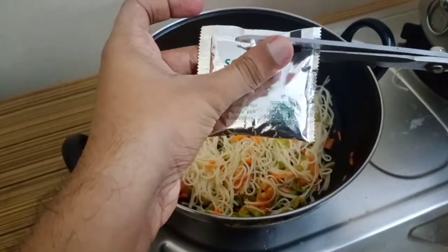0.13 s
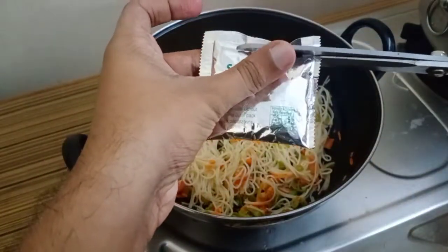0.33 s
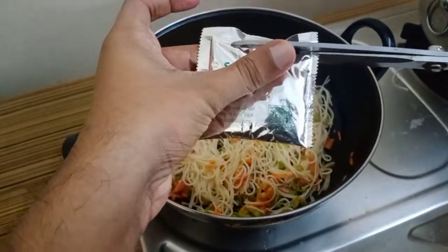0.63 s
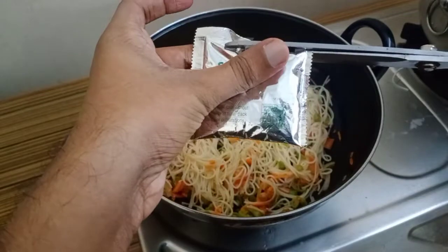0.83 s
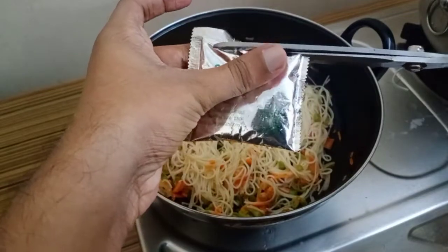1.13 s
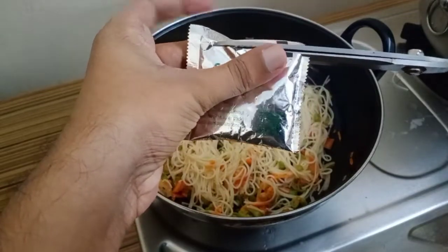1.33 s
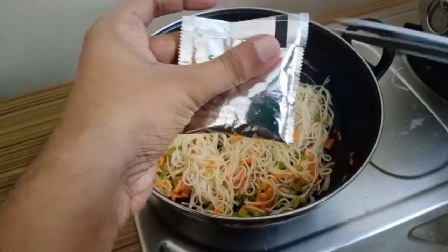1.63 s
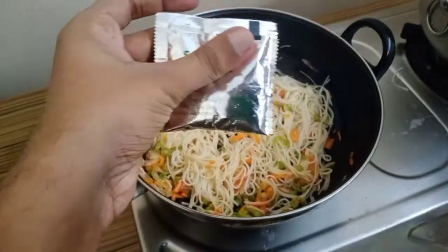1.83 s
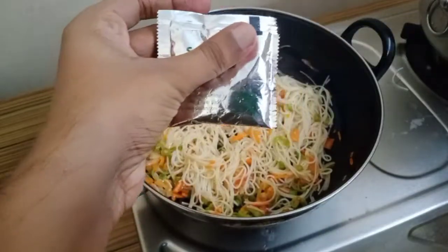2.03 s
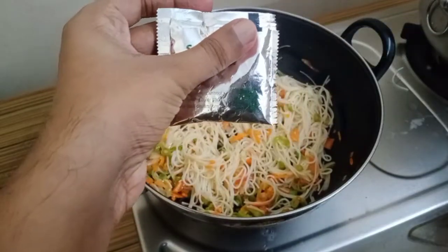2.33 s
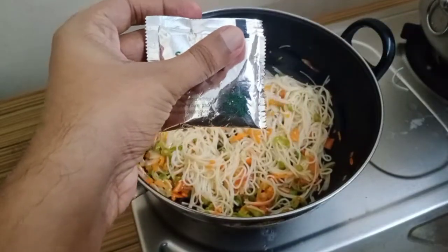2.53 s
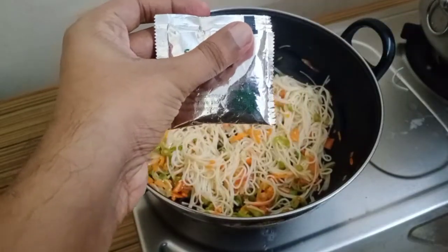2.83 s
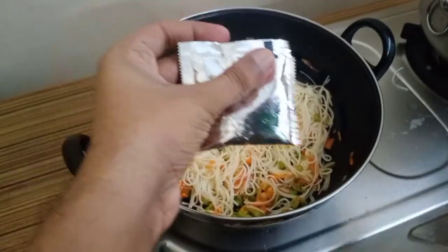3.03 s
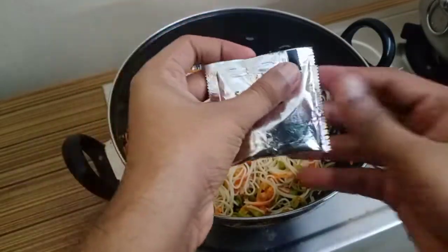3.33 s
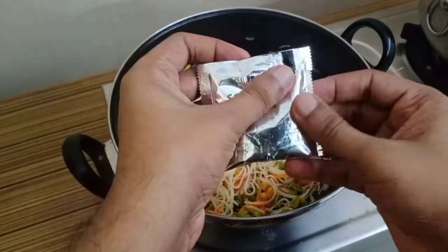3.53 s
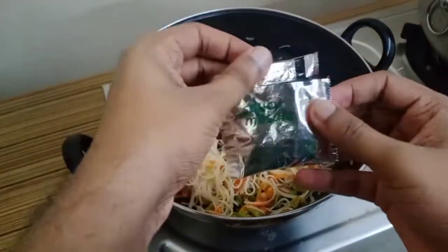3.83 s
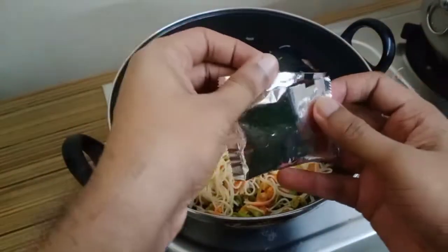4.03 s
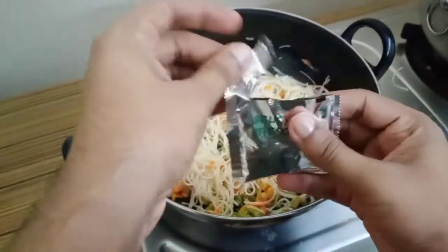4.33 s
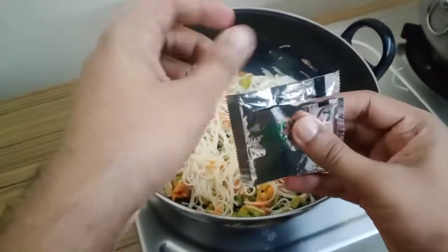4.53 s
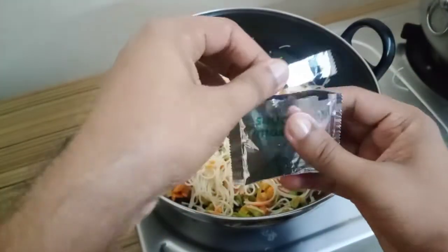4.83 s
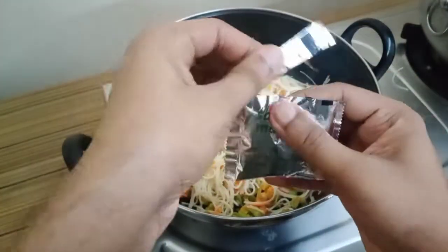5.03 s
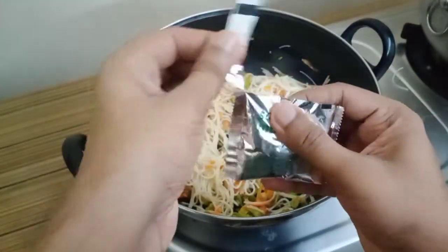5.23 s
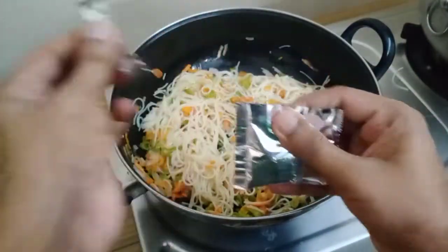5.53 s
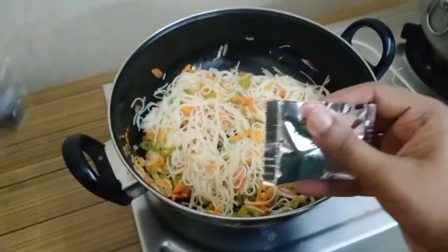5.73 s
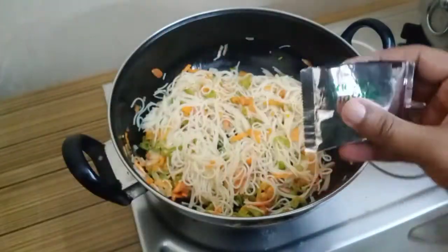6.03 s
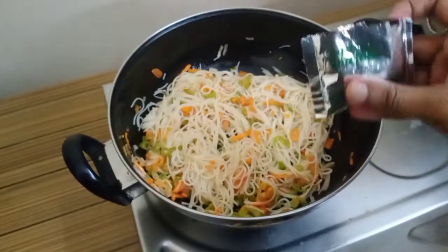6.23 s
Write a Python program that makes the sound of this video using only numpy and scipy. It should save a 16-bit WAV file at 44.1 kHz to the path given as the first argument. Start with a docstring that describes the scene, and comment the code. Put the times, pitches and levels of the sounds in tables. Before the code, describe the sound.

A foil sachet crackles and is snipped, scissors clatter onto a counter, then the foil is torn, over a faint throbbing hum and soft sizzle.

```python
"""A low rumble, a softly sizzling pan and the rustle of a foil sachet open the scene, close to a phone in a
kitchen; a low hum throbs four times a second, perhaps a wobbling fan. The foil crinkles, is snipped and torn;
the scissors are put down on a counter with three knocks and a few bounces that ring in the room.
Filtered noise makes rumble and rustle, sparse clicks the sizzle, a gliding sine the hum; bursts and decaying
resonances make snaps and knocks. The phone's noise suppressor cuts quiet sound."""
import sys
import numpy as np
from scipy import signal
from scipy.io import wavfile
from scipy.ndimage import uniform_filter1d

SR = 44100
rng = np.random.default_rng(int(sys.argv[2]) if len(sys.argv) > 2 else 0)


def output_pcm(signal):
    """Save a mono or channel-first signal as 16-bit PCM at the path in sys.argv[1].

    Samples are clipped to [-1, 1] before scaling.
    """
    pcm = np.clip(np.atleast_2d(signal).T, -1, 1) * 32767
    wavfile.write(sys.argv[1], SR, np.round(pcm).astype(np.int16))


N = 281799  # length in samples


def amp(db):
    """Decibel law: the amplitude ratio of a level."""
    return 10 ** (np.asarray(db) / 20)


def evened(x):
    """Normalisation to an effective (RMS) value of 1."""
    return x / np.sqrt(np.mean(x ** 2) + 1e-20)


def read(points, hz):
    """Interpolation of a spectrum on a logarithmic frequency axis."""
    f, value = np.transpose(points)
    return np.interp(np.log(hz + 1), np.log(f + 1), value)


def along(rows):
    """Linear interpolation in time: the columns of a curve at every sample."""
    s, *columns = np.transpose(rows)
    return [np.interp(np.arange(N) / SR, s, c) for c in columns]


def add(mix, s, sound):
    """Superposition: a sound joins the mix, in place, from time s in seconds."""
    part = mix[round(s * SR):][:len(sound)]
    part += sound[:len(part)]


def coloured(x, points, tilt_db=0.):
    """Minimum-phase filtering: a causal filter of energy 1, its spectrum tilted in dB per octave around 1 kHz."""
    hz = abs(np.fft.fftfreq(4096, 1 / SR))
    level_db = read(points, hz) + tilt_db * np.log2((hz + 50) / 1000)
    log_gain = np.log(amp(level_db))
    # the Hilbert transform of the log gain gives the phase of a causal filter
    response = np.exp(np.conj(signal.hilbert(log_gain)))
    taps = np.fft.ifft(response).real[:2048]
    return signal.oaconvolve(x, taps / np.linalg.norm(taps))[:len(x)]


def band(x, hz, width_hz):
    """Simple resonance: a two-pole resonator of gain 1 at its centre."""
    return signal.lfilter(*signal.iirpeak(hz, hz / width_hz, SR), x)


def split(x, hz, side):
    """Crossover filtering: the part of a sound below or above a frequency."""
    return signal.sosfilt(signal.butter(4, hz, side, fs=SR, output="sos"), x)


def crackle(per_s, spread_db):
    """Random impulse train: sparse clicks of random sign, a few of them large."""
    size_db = spread_db * np.minimum(rng.exponential(1, N), 5)
    size = amp(size_db) * rng.choice([-1., 1.], N)
    return evened(size * (rng.random(N) < per_s / SR))


def patchy(x, depth_db):
    """Spectral modulation: random patches in time and frequency, as each bit of foil favours other pitches."""
    z = signal.stft(x, nperseg=256)[2]
    field = rng.standard_normal(z.T.shape).T
    field = uniform_filter1d(field, size=3, axis=0)
    field = evened(uniform_filter1d(field, size=14, axis=1))
    return signal.istft(z * amp(depth_db * field), nperseg=256)[1][:N if len(x) == N else len(x)]


# Reverberation of the kitchen. Each row: frequency in Hz, time to decay by 60 dB in seconds.
ROOM_T60 = [(100, 1.0), (250, 0.91), (500, 0.55), (1000, 0.74), (2000, 0.65), (3500, 0.66), (6000, 0.49),
            (12000, 0.37)]


def room(x):
    """Diffuse reverberation: dense reflections, each band dying at its own speed with an even share of energy."""
    hz, t, z = signal.stft(rng.standard_normal(SR), SR, nperseg=512)
    dying = amp(-60 * t / read(ROOM_T60, hz)[:, None])
    z = z * dying
    z *= (np.linalg.norm(dying, axis=1) / np.linalg.norm(z, axis=1))[:, None]
    tail = signal.istft(z, SR, nperseg=512)[1]
    tail *= 1 - np.exp(-np.arange(len(tail)) / (.003 * SR))  # gradual build-up
    return signal.fftconvolve(x, tail / np.linalg.norm(tail))[:len(x)]


# Spectrum of the kitchen rumble. Each row: frequency in Hz, relative density in dB per Hz.
AIR_SPECTRUM = [(24, -59), (40, -42), (100, -25.5), (173, -3.5), (237, -14), (306, 0), (443, -13),
                (615, -12), (1200, -20.5), (1700, -38)]
# Course of the rumble. Each row: time in seconds, level in dB.
AIR_COURSE = [(0, -50.5), (.8, -56), (1.0, -62), (2.2, -66.5), (3.3, -68), (6.39, -67.5)]
# Fuzzy hums in the rumble. Each row: frequency in Hz, width in Hz, level against the rumble in dB.
AIR_HUMS = [(165, 64, -7), (454, 17, -9.5)]


def air():
    """Narrow-band noise: low kitchen rumble with two hums blurred by their bandwidth."""
    noise = rng.standard_normal(N)
    hums = sum(amp(db) * evened(band(noise, hz, width)) for hz, width, db in AIR_HUMS)
    rumble = coloured(rng.standard_normal(N), AIR_SPECTRUM)
    return amp(along(AIR_COURSE)[0]) * (rumble + hums)


# Spectrum of the frying oil. Each row: frequency in Hz, relative density in dB per Hz.
SIZZLE_SPECTRUM = [(1760, -79), (3000, -24.5), (5050, -22.5), (5500, -15), (6670, -11.5), (9460, -31),
                   (12300, -29.5), (15100, -27), (16000, -29.5), (16500, -63)]
SIZZLE_DB, SWELL_DB = -55, 3.5  # level of the pan and RMS depth of its slow swell


def pan():
    """Shot noise: dense tiny bursts of frying oil that swell a little."""
    bursts = crackle(2500, 4.2)
    swell = evened(split(rng.standard_normal(N), 3, "low"))
    oil = coloured(bursts + 0.5 * rng.standard_normal(N), SIZZLE_SPECTRUM)
    return amp(SIZZLE_DB + SWELL_DB * swell) * oil


# Spectrum of the foil before any tilt. Each row: frequency in Hz, relative density in dB per Hz.
FOIL_SPECTRUM = [(290, -72), (500, -18.5), (938, -13.5), (1220, -6), (1760, 0), (2100, -16), (2430, -4.5),
                 (3660, 0.5), (4760, -1), (6660, 5), (9460, -23), (15100, -22), (16500, -26)]
TICKS_PER_S, TICK_DB, TICK_T60 = 63, -4.5, 0.044  # stray creases: rate, level against the rustle curve, ring in s


def ticks():
    """Impulse response: stray creases click sparsely, each with a short ring at one of 16 pitches."""
    clicks = crackle(TICKS_PER_S, 3.3)
    which = rng.integers(0, 16, N)
    t = np.arange(4000) / SR
    decay = amp(-60 * t / TICK_T60)
    rings = sum(signal.oaconvolve(clicks * (which == k), decay * np.sin(2 * np.pi * hz * t))[:N]
                for k, hz in enumerate(np.geomspace(1300, 5200, 16)))
    return coloured(clicks, FOIL_SPECTRUM) + 0.95 * evened(rings)


# Handling of the foil in two stretches of rows.
# Each row: time in seconds, relative rustle level in dB, relative level of the fizz above 11.5 kHz in dB.
FOIL_HANDLING = [
    [(0.0, -56.5, -78), (0.1, -62, -80), (0.27, -64, -86), (0.54, -66, -84), (0.67, -65, -58),
     (1.05, -78, -66), (1.45, -62.5, -51.5), (1.94, -65, -74), (2.2, -71, -45.5)],
    [(3.15, -82, -68.5), (3.31, -65.5, -81), (3.75, -59.5, -68), (4.33, -52.5, -55.5), (4.6, -76, -52.5),
     (4.9, -60.5, -76), (5.17, -56, -54.5), (5.69, -70, -64), (6.39, -59.5, -81.5)],
]


def rustle():
    """Crackling noise: small creases merge into a rustle with treble fizz; the stray ticks follow its level."""
    rustle_db, fizz_db = along(sum(FOIL_HANDLING, []))
    creases = crackle(880, 4.9) + 0.69 * rng.standard_normal(N)
    treble = evened(split(creases, 11500, "high"))
    hiss = amp(rustle_db) * coloured(creases, FOIL_SPECTRUM, -5.5) + amp(fizz_db - 5.5) * treble
    return hiss, amp(rustle_db + TICK_DB) * ticks()


# Foil snaps. Each row: time in seconds, level in dB, length in ms, pitch of the crease in Hz, then against
# the snap's bright part: body under 2.4 kHz in dB, fizz above 12 kHz in dB; last, crumpling against the snap in dB.
FOIL_SNAPS = [(0.034, -38, 1.8, 1330, -13, -11, -14), (0.0643, -34, 0.98, 3560, -9, -4, -15.5),
              (0.1841, -39.5, 2.3, 5000, -11, -8, -14), (0.24, -42, 2, 1380, -0.5, 0, -11.5),
              (0.4048, -32.5, 11.4, 1540, -6.5, -32, -34), (0.4293, -39.5, 0.93, 1680, -15, -47, -30),
              (0.46, -38, 1.2, 3740, -10, -18, -16), (0.5778, -25.5, 3.8, 3920, -19, -28, -23.5),
              (0.612, -36.5, 1.4, 3740, -11.5, -11, -15.5), (0.6771, -33.5, 2.5, 2300, -4, -2, -10.5),
              (0.7149, -24.5, 25, 3300, -11, -5.5, -21), (0.8818, -36, 1.6, 3570, -32, -27, -26),
              (0.9291, -30, 1.9, 4950, -56, -43, -41), (0.9627, -34.5, 1.7, 4700, -17.5, -1.5, -13.5),
              (1.021, -36.5, 2.6, 2670, -6.5, -20, -15.5), (1.1848, -33.5, 1.7, 3400, -16, -5, -12),
              (1.2065, -23, 2.2, 3150, -14.5, -10, -18), (1.2251, -15.5, 12, 2340, -10.5, -11.5, -48),
              (1.3411, -32, 2.6, 4260, -28, -0.5, -16.5), (1.4419, -31, 1.3, 3500, -6, -21, -34.5),
              (1.4981, -32.5, 6.4, 2340, -15, -35, -17.5), (1.557, -33.5, 1.3, 3360, -5.5, 3, -18.5),
              (1.6451, -34, 1.7, 4700, -40, 1, -25), (1.68, -30.5, 5.9, 4830, -9, -13, -16.5),
              (1.8074, -37.5, 1.3, 4070, -42, -2, -12), (1.932, -38, 2.4, 4300, -15, -15, -22),
              (1.9514, -36, 2.3, 3200, -9, -10, -21.5), (1.993, -41.5, 1.6, 4100, -10, -23, -31),
              (2.07, -43.5, 0.77, 3800, -3, -2.5, -14), (2.8963, -37.5, 0.77, 1380, -32, -14, -7),
              (3.1658, -32, 1.9, 4130, -43, -1, -35), (3.1968, -32, 1.3, 4400, -29, -32, -17),
              (3.21, -29, 4.7, 4750, -15.5, -40, -21), (3.2353, -25.5, 1.7, 4270, -9, -31, -27.5),
              (3.2441, -37, 3.3, 4730, -6.5, -33, -13.5), (3.2878, -36, 3.5, 3550, 0.5, -23, -35),
              (3.3253, -29.5, 1.8, 4630, -37, -39, -23), (3.3661, -30, 1.4, 4880, -12, -10, -19),
              (3.405, -34, 4, 1300, -9, -10, -12.5), (3.4398, -23.5, 2.1, 4400, -7, -12, -28.5),
              (3.616, -54, 2.9, 4600, -66, -27, -34), (3.89, -45, 1.5, 4480, -25, -23, -27),
              (3.9374, -48, 2.8, 4500, -20, -45, -36), (4.0493, -29.5, 1.8, 4700, -5.5, -27, -19.5),
              (4.1103, -29, 0.61, 4600, -32, -20, -40), (4.2004, -28.5, 1.8, 3100, -37, -4, -45),
              (4.2261, -30, 3, 4600, -35, -26, -27), (4.291, -37.5, 3.4, 3750, -8, -36, -7),
              (4.3595, -26, 1.9, 4770, -10.5, -27, -46), (4.4209, -19.5, 19.5, 1480, -7, -9, -54),
              (4.4329, -20.5, 2.2, 1240, -4.5, -10, -28), (4.5416, -30, 2, 1970, -14.5, -3, -21.5),
              (4.6384, -40, 0.79, 5500, -12.5, -10, -11.5), (4.738, -32, 3.2, 4400, -43.5, -40, -29),
              (4.779, -33.5, 3, 1440, -3.5, -30, -16), (4.7915, -31.5, 2.5, 1650, -4, -9.5, -16),
              (4.8463, -32, 1.3, 3740, -30, -39, -23), (4.8943, -34.5, 11, 5700, -19, -31, -21),
              (4.9585, -27.5, 0.27, 4070, -28, -8, -20.5), (4.9693, -38, 4.2, 5300, -5, 0.5, -18.5),
              (5.0414, -35, 2, 4440, -3.5, 1, -27), (5.0741, -31, 3.1, 3700, -8.5, -7.5, -19),
              (5.095, -38.5, 2.1, 1530, -3, -24, -20.5), (5.1371, -23, 2.8, 5370, -20, -8, -28),
              (5.185, -45, 1.5, 1820, 3, -25, -27), (5.24, -36.5, 1.4, 2960, -3.5, -18, -20),
              (5.2976, -26, 4.2, 4180, -7, -8.5, -20), (5.3219, -29, 1.6, 1360, -20, -2.5, -21.5),
              (5.3383, -28.5, 2.7, 1700, 1, -23, -47), (5.37, -30.5, 1.2, 5140, -23, -19, -33),
              (5.432, -40, 2.4, 4000, -6, -27, -12.5), (5.5236, -18, 14.4, 1524, -10.5, -10, -33),
              (5.6902, -18.5, 4, 5300, -36.5, -33, -43), (5.7151, -31.5, 1.2, 4800, -5.5, -31, -23.5),
              (5.82, -41, 1.2, 3500, -34, -33.5, -13), (5.8324, -36, 2, 1740, -7.5, 0, -17.5),
              (5.8754, -30.5, 3.4, 1530, -14, -1, -34), (5.9112, -28, 1.9, 4560, -11, -36, -15),
              (6.0323, -39, 2.5, 3730, -27, -20, -17), (6.235, -31, 1.5, 4000, -10.5, -42, -15.5)]


def snaps():
    """Sudden release of strain: each crease snaps or rips, rings at its own pitch and crumples on briefly."""
    lead = .015  # seconds kept before each snap
    snapping, crumpling = np.zeros((2, N))
    t = np.arange(round(.16 * SR)) / SR - lead
    draws = rng.standard_normal((len(FOIL_SNAPS), 2, len(t)))
    for (s, db, ms, hz, body_db, fizz_db, after_db), (noise, luck) in zip(FOIL_SNAPS, draws):
        # the crease itself at time 0, and a few further ones
        grain = noise * (1 + 3.3 * (luck > 2.2)) + 4.0 * (abs(t) < .6 / SR)
        rip = np.exp(-abs(t) * 1000 / (ms * np.where(t < 0, .18, .3)))  # rises faster than it falls
        dying = amp(-60 * t / 0.18) * (t > 0)
        burst = grain * np.array([rip, dying])  # row 0 snaps, row 1 crumples
        ring = 2.2 * band(burst, hz, 0.045 * hz)
        bright = np.array([coloured(b, FOIL_SPECTRUM) for b in split(burst, 2760, "high")]) + ring
        body = split(split(burst, 2445, "low"), min(1180, 0.66 * hz), "high")
        fizz = split(burst, 12000, "high")
        parts = ((0, bright), (body_db, body), (fizz_db, fizz))
        # each part is scaled by its peak within the snap
        snap, after = sum(amp(level) * part / abs(part[0]).max() for level, part in parts)
        add(snapping, s - lead, amp(db) * snap)
        early_level = after[(t > 0) & (t < .045)].std()
        add(crumpling, s - lead, amp(db + after_db) * after / early_level)
    return snapping, crumpling


def foil():
    """Superposition of direct and reflected sound: rustle, snaps and ticks with the room's answer."""
    hiss, stray = rustle()
    snapping, crumpling = snaps()
    direct = snapping + patchy(crumpling + hiss, 4.0) + stray
    return direct + amp(-7.5) * room(direct)


# Throbs of the hum. Each row: start in seconds, time to the peak in seconds (kept within limits below),
# length in seconds, peak of the tone's envelope in dB (RMS), opening pitch in Hz, rumble against the tone in dB.
HUM_THROBS = [(0.005, .015, 0.078, -45.5, 306, -3), (0.227, 0.028, .17, -44, 328.6, -15),
              (0.495, 0.039, 0.1, -48, 314.2, 1), (0.735, 0.03, 0.089, -45.5, 303, 0.5),
              (0.97, 0.058, 0.15, -43, 304.2, -6), (1.209, .012, 0.15, -44, 299.7, -21),
              (1.442, 0.013, 0.14, -46, 277, -21), (1.689, 0.041, .16, -46.5, 312, -8),
              (1.957, 0.036, 0.081, -45.5, 329, -3), (2.467, 0.06, 0.3, -48.5, 310, 1),
              (3.019, .015, .14, -48, 306, 3.5), (3.24, 0.047, 0.12, -42.5, 295, -2.5),
              (3.475, 0.015, 0.13, -42, 304.5, -10), (3.757, 0.044, 0.068, -46, 299, -3),
              (3.967, 0.006, 0.14, -41.5, 274, -9), (4.218, 0.055, .16, -45.5, 323, 2),
              (4.449, 0.02, 0.092, -44.5, 294, -8.5), (4.707, 0.031, 0.096, -45, 274, 0.5),
              (4.958, 0.025, 0.15, -45.5, 319.6, -1.5), (5.201, 0.034, .14, -46.5, 308, 0.5),
              (5.454, 0.058, 0.11, -45.5, 286.4, 5), (5.705, 0.034, .16, -45, 308.6, -12),
              (5.97, 0.039, 0.14, -45.5, 313.6, -2.5), (6.217, 0.03, 0.3, -48, 312, 6)]
# Air moved with each throb. Each row: frequency in Hz, relative density in dB per Hz.
PUFF_SPECTRUM = [(40, -34), (110, -8.5), (170, -10), (230, 6), (420, -12), (520, -57.5), (800, -25)]
THROB_HZ, SETTLE_S = 316.9, 0.0626  # the pitch every throb glides to, and the time constant of the glide
ONSET_DB, SAG_DB, RELEASE_S = -13, -8, 0.028  # start and end of a throb against its peak; its last fade


def throbs():
    """Amplitude and frequency modulation: a gliding tone with a puff of rumble, switched on once a turn."""
    tone, unrest, puff = np.zeros((3, N))
    for s, rise, length, db, hz, rumble_db in HUM_THROBS:
        t = np.arange(0, length + RELEASE_S, 1 / SR)
        rise = np.clip(rise, .002, length - .01)
        corners = [0, rise, length, length + RELEASE_S]
        shape = amp(db + np.interp(t, corners, [ONSET_DB, 0, SAG_DB, -35]))
        early = np.exp(-t / SETTLE_S)
        pitch = THROB_HZ + (hz - THROB_HZ) * early
        add(unrest, s, shape * (.15 + early))
        add(puff, s, shape * early * amp(rumble_db))
        add(tone, s, shape * np.sqrt(2) * np.sin(2 * np.pi * np.cumsum(pitch) / SR))
    flutter = evened(band(band(rng.standard_normal(N), 305.7, 58), 305.7, 58))
    rumble = coloured(rng.standard_normal(N), PUFF_SPECTRUM)
    return tone + amp(1) * unrest * flutter + puff * rumble


# Scissors on the counter. Each row: time in seconds, relative strength of the blow in dB, steel blade against
# counter in dB, brightness in dB per octave, relative level of the ringing modes in dB.
SCISSOR_KNOCKS = [(2.2197, -12, 16, 0.5, -13), (2.394, -17, -4, 2.5, -9), (2.475, -22, -8.5, -2.5, -14),
                  (2.575, -29.5, -1, 1, -22.5), (2.699, -6.5, -25, 0, -11), (2.79, -17, -12, -0.5, -5.5)]
# Colour of a blow before its brightness tilt. Each row: frequency in Hz, relative density in dB per Hz.
COUNTER_SPECTRUM = [(35, -55.5), (60, -18.5), (113, -23.5), (177, -12.5), (366, -6), (453, -7.5),
                    (573, 0.5), (796, -11), (2600, -16.5), (6450, -23), (9400, -54.5), (15000, -38.5),
                    (16500, -66)]
# Steel resonances, each applied twice. Each row: frequency in Hz, width of one pass in Hz, relative level in dB.
BLADE_MODES = [(592, 110, -1.5), (1173, 220, 2), (1653, 260, -4.5), (2280, 260, -7.5), (3143, 450, -2),
               (3750, 260, -2.5), (4480, 130, -5), (5400, 550, -1), (6350, 810, -1)]
# Counter and room modes. Each row: frequency in Hz, level before tilt in dB, time to decay by 60 dB in seconds.
RING_MODES = [(122, -16.5, .95), (175.2, -10, 0.55), (232.6, -19.5, 0.5), (323, -23.5, 0.95),
              (429.8, -5, 0.34), (459.5, -3, 0.39), (534, -22.5, .6), (554, -6.5, 0.54), (592.7, -6, 0.5),
              (660, -29.5, 0.91), (707.5, -13, 0.27), (754, -12, 0.27), (883, -17, 0.56), (1227, -38, 0.35)]


def knocks():
    """Modal excitation: a hard tick coloured by counter and blade, the modes it rings, the room's long answer."""
    out = np.zeros(N)
    t = np.arange(SR) / SR
    draws = rng.standard_normal((len(SCISSOR_KNOCKS), len(t)))
    for (s, db, blade_db, tilt_db, ring_db), draw in zip(SCISSOR_KNOCKS, draws):
        contact = (t == 0) + .06 * draw * np.exp(-t / .004)  # an impulse and a short scrape of noise
        blade = sum(amp(level) * band(band(contact, hz, width), hz, width) / np.sqrt(width)
                    for hz, width, level in BLADE_MODES)
        steel = amp(blade_db) * blade / np.linalg.norm(blade)
        tick = coloured(contact, COUNTER_SPECTRUM, tilt_db) + steel
        tick *= 4.64 / np.linalg.norm(tick)
        ring = sum(amp(level + tilt_db * np.log2(hz / 1000) - 60 * t / t60) * np.sin(2 * np.pi * hz * t)
                   for hz, level, t60 in RING_MODES)
        ring *= 1 - np.exp(-t / 0.002)  # room modes build up
        # in the bass the single modes take over from the diffuse field
        diffuse = room(tick - 0.5 * uniform_filter1d(tick, size=90))
        add(out, s, amp(db) * (amp(-0.5) * tick + amp(6.5) * diffuse + amp(ring_db) * ring))
    return out


def scene():
    """Linear superposition of all sources, as one channel."""
    return (air() + pan() + foil() + throbs() + knocks())[None]


# Threshold of the noise suppressor. Each row: frequency in Hz, level in dB.
SUPPRESSOR_THRESHOLD = [(100, -65.5), (300, -57), (700, -60), (2000, -65.5), (4500, -68.5), (6500, -80.5),
                        (10000, -78), (15000, -74)]
EDGE_HZ = 16300  # upper band limit


def record(dry):
    """Spectral gating: bands whose smoothed level sinks under the threshold are lowered; then the band limit."""
    hz, _, z = signal.stft(dry[0], SR, nperseg=512, noverlap=384)
    power = uniform_filter1d(abs(z) ** 2, size=3, axis=0)
    power = abs(uniform_filter1d(power, size=11, axis=1))
    threshold = amp(2 * read(SUPPRESSOR_THRESHOLD, hz))[:, None]  # as power
    gain = np.maximum(power / (power + threshold), amp(-12.5))
    kept = signal.istft(z * gain, SR, nperseg=512, noverlap=384)[1][:N]
    low_pass = signal.firwin(511, EDGE_HZ, window=("kaiser", 9), fs=SR)
    return signal.oaconvolve(kept, low_pass, "same")[None]


dry = scene()
out = record(dry)
output_pcm(out)
```